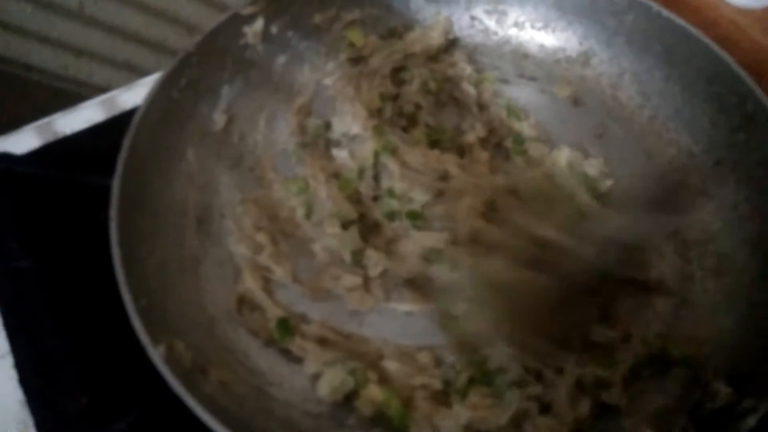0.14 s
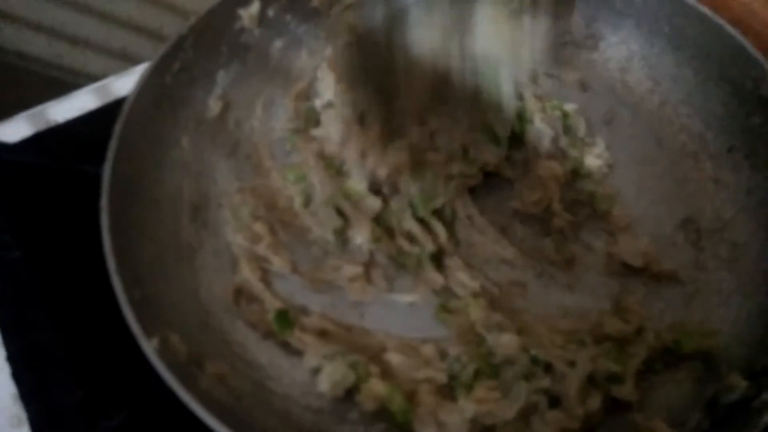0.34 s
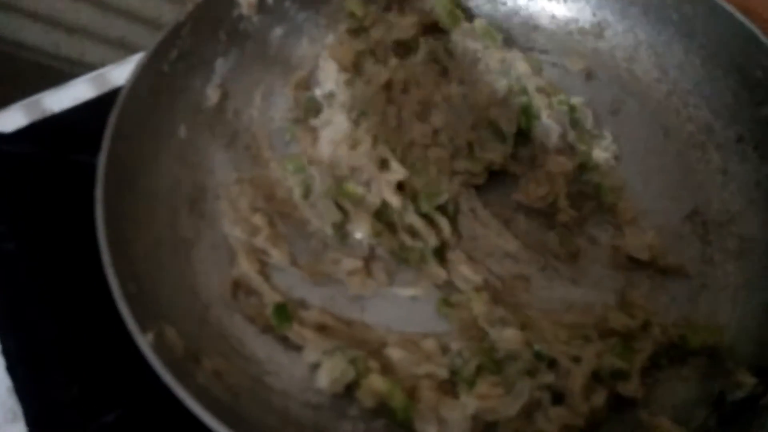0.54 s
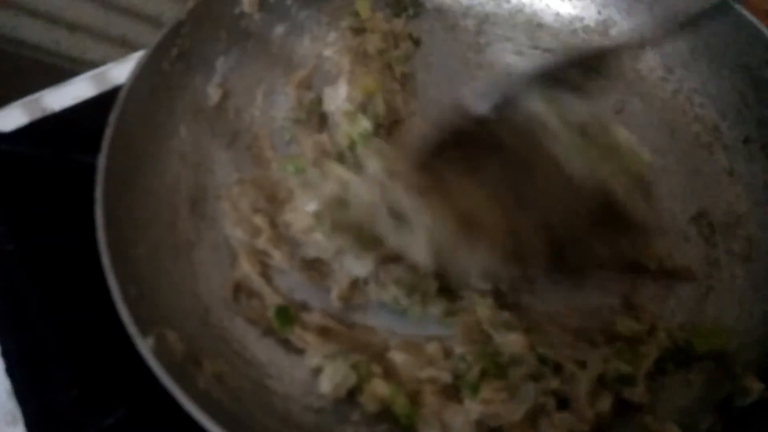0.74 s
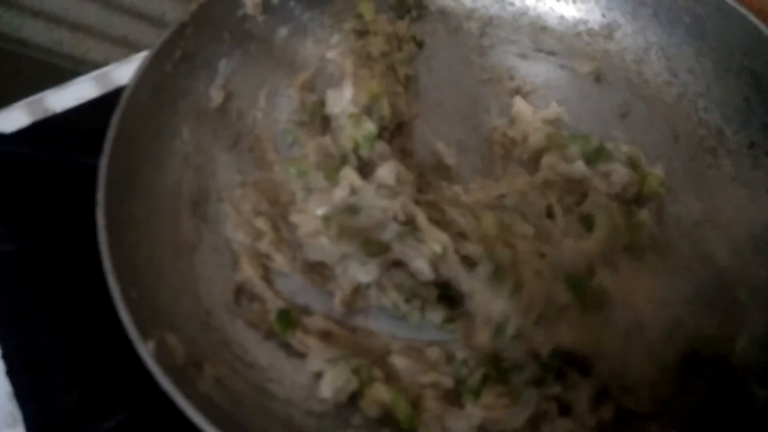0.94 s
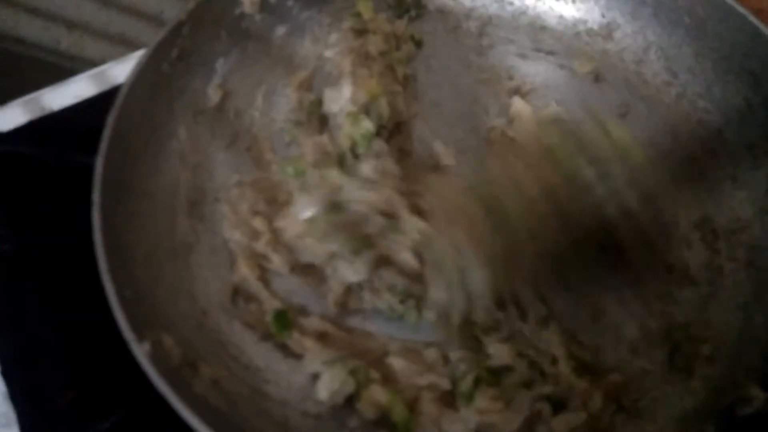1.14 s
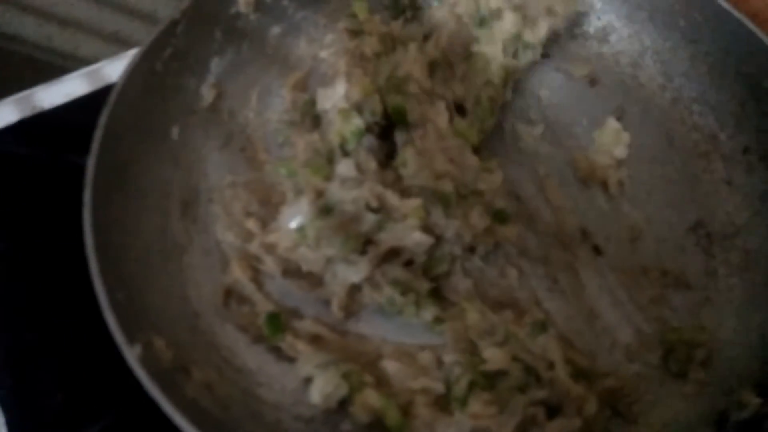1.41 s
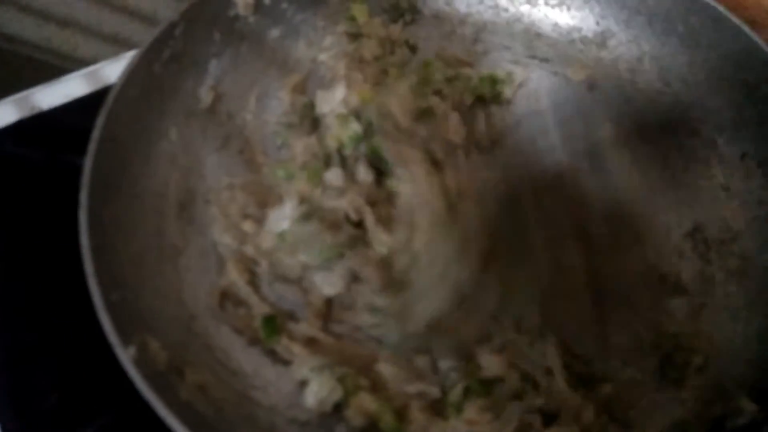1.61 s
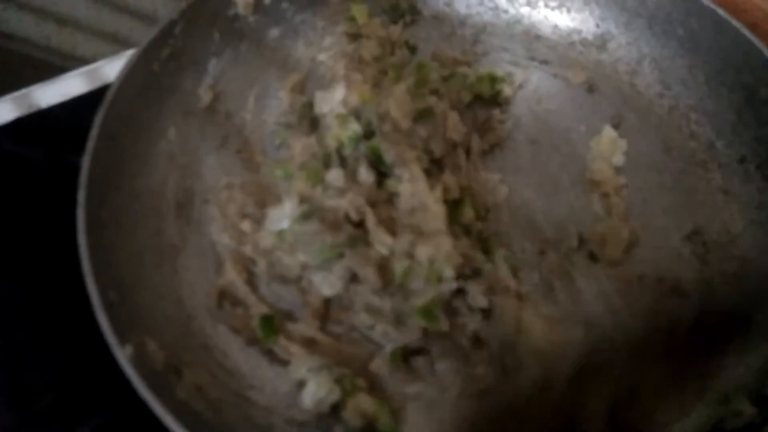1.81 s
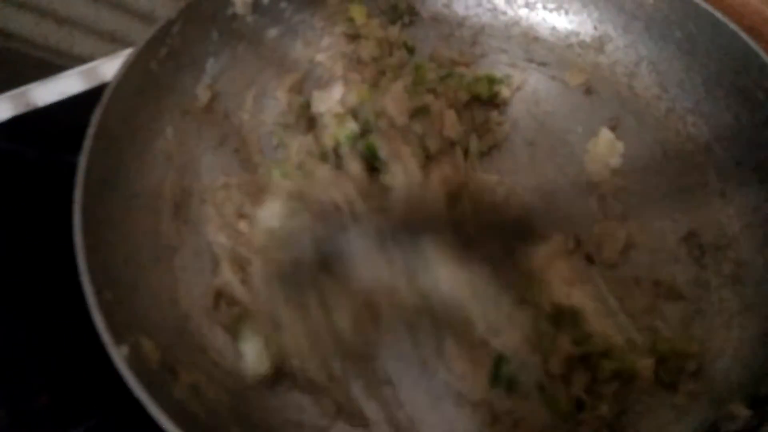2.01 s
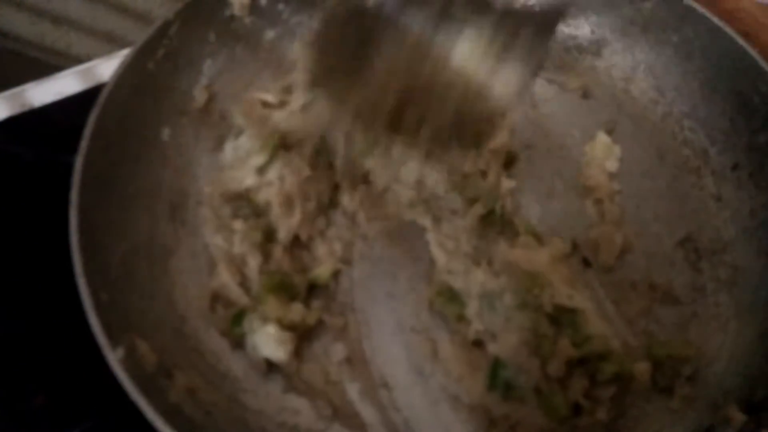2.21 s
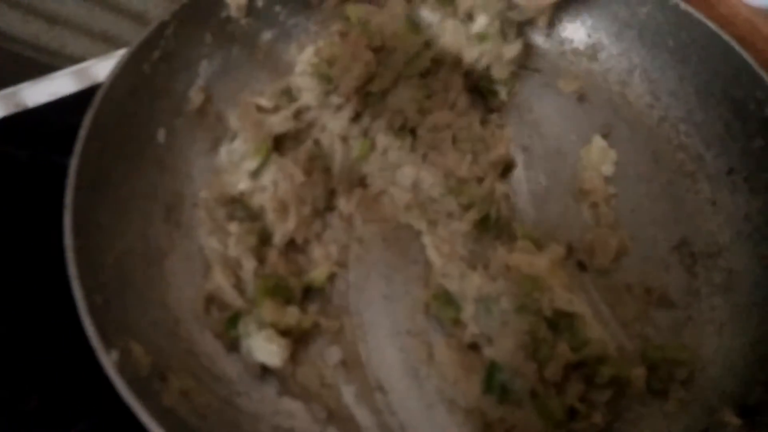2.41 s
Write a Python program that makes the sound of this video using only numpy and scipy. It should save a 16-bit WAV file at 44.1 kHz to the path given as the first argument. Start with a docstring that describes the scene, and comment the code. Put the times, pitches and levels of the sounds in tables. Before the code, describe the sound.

Close up in a small kitchen, a spatula lands on a food-damped frying pan about every half second, knocking and rasping; the strokes after the middle are hardest, with a brief metallic squeal over faint room hum.

```python
"""In a home kitchen, a metal spatula stirs thick sauce in a steel frying pan.
Each stroke lands with a dull push and a double knock, which ring damped pan modes, then scrapes:
dense random slips excite the same modes. The sliding edge briefly sings in gliding tones.
The sticky sauce crackles in filtered grains and ticks in noise puffs. Room tone, a low drone and
the pan's groan lie below, and decaying noise bands give the kitchen's reverberation."""
import sys
import numpy as np
from scipy import signal
from scipy.fft import rfft, irfft
from scipy.io import wavfile

SR = 44100
rng = np.random.default_rng(int(sys.argv[2]) if len(sys.argv) > 2 else 0)


def to_wav(s):
    """Save 16-bit WAV."""
    ch = np.atleast_2d(s).T  # columns
    pcm = np.round(np.clip(ch, -1, 1) * 32767)  # PCM
    wavfile.write(sys.argv[1], SR, pcm.astype(np.int16))


N = 112454

# Modes of the sauce-damped pan. Each row: frequency in Hz, relative level in dB, t60 in seconds.
PAN_MODES = [(304, -33, 0.06), (444.5, -14, 0.17), (581, -15.5, 0.099), (750, -10, 0.06),
             (1059, 4.5, 0.013), (1241.5, -2.5, 0.05), (1367, -2, 0.033), (1563, 5, 0.017),
             (1945, 2, 0.014), (2206, -2.5, 0.025), (2504, -6.5, 0.006), (3580, -4, 0.0091),
             (4356, -4.5, 0.0099), (5385, 7.5, 0.0047), (6284, -3.5, 0.018), (6800, -2.5, 0.022),
             (7845, 3, 0.01), (8450, 4, 0.0078), (9324, 5, 0.012)]
# Spectrum of the sauce crackle. Each row: frequency in Hz, relative density in dB per Hz.
CRACKLE_SPECTRUM = [(1500, -28.5), (3200, -23), (4800, -15), (6000, -10.5), (7500, -7.5), (9150, 1),
                    (11000, -8), (12500, -15), (14000, -8), (15500, -20.5)]
TREBLE_HZ = 3000   # the pan's treble modes lie above this


def amp(db):
    """Level law: 20 dB is a factor of ten in amplitude."""
    return 10 ** (np.asarray(db) / 20)


def rms_one(x):
    """Normalization: scales a signal to unit root mean square."""
    return x / np.sqrt(np.mean(x ** 2) + 1e-20)


def in_time(rows):
    """Linear interpolation: turns rows led by a time in seconds into one curve per column."""
    s, *columns = np.transpose(rows)
    return [np.interp(np.arange(N) / SR, s, c) for c in columns]


def band_pass(x, order, low_hz, high_hz):
    """Band limiting: a Butterworth filter passes low_hz to high_hz."""
    return signal.sosfilt(signal.butter(order, [low_hz, high_hz], "band", fs=SR, output="sos"), x)


def coloured(x, spectrum):
    """Spectral shaping: weights x by a (Hz, dB) curve, at -90 dB beyond its ends."""
    hz, db = np.transpose(spectrum)
    grid = np.arange(len(x) // 2 + 1) * SR / len(x) + 1
    gain = amp(np.interp(np.log(grid), np.log(hz), db, -90, -90))
    return irfft(rfft(x) * gain, len(x))


def ring(clicks, hz, t60):
    """Damped resonance: a unit click sets a decaying sine of initial height 1 ringing."""
    r = amp(-60 / (t60 * SR))
    w = 2 * np.pi * hz / SR
    return signal.lfilter([0, np.sin(w)], [1, -2 * r * np.cos(w), r * r], clicks + 1e-18)


def drift(hz):
    """Low-passed noise: slow random movement of rms 1, with two equal poles at hz."""
    step = 40   # computed on every 40th sample, then interpolated
    r = np.exp(-2 * np.pi * hz * step / SR)
    noise = rng.standard_normal(N // step + 502)
    slow = signal.lfilter([1], [1, -2 * r, r * r], noise)[500:]   # drops the settling time
    return np.interp(np.arange(N) / step, np.arange(len(slow)), rms_one(slow))


def grains(per_s, spread_db):
    """Shot noise: random clicks of uneven size and either sign, rms 1 overall."""
    sizes = amp(spread_db * np.minimum(rng.exponential(1, N), 5)) * rng.choice([-1, 1], N)
    return rms_one(sizes * (rng.random(N) < per_s / SR))


def burst(times, gains, t60s):
    """Exponential decay: short noise puffs die away from each start time."""
    envelope = np.zeros(N)
    t = np.arange(4000) / SR
    for s, gain, t60 in zip(times, gains, t60s):
        i = int(s * SR)
        envelope[i:i + 4000] += gain * amp(-60 * t / max(t60, .001))[:N - i]
    return envelope * rng.standard_normal(N)


def hum(curve, hz, width_hz, steady):
    """Random modulation: a tone wavers in strength and pitch along a level curve."""
    pitch = 1 + .03 * drift(4)   # wavers by a 0.03 share, at up to about 4 Hz
    tone = np.sin(2 * np.pi * hz * np.cumsum(pitch) / SR)
    level = amp(in_time(curve)[0])
    return level * rms_one((steady + drift(width_hz)) * tone)


def room_tone():
    """Stationary noise: a fixed spectrum gives the quiet room hum."""
    # Room spectrum. Each row: frequency in Hz, relative density in dB per Hz.
    room_spectrum = [(15, -12.5), (25, 4), (43, 5.5), (127, 18.5), (228, -2.5), (314, 0.5), (520, -1),
                     (1190, -2.5), (2080, -10.5), (3930, -25), (9220, -53), (11700, -47), (14500, -9)]
    room_db = -62   # rms
    return amp(room_db) * rms_one(coloured(rng.standard_normal(N), room_spectrum))


def low_drone():
    """Narrow-band tone: a low drone fades from the start and then swells once."""
    # Drone level. Each row: time in seconds, level in dB.
    drone_levels = [(0.0, -60), (0.23, -69.5), (0.43, -83), (1.03, -48), (1.16, -58.5), (2.31, -87),
                    (2.5, -81)]
    return hum(drone_levels, hz=63, width_hz=3, steady=2.5)


def pan_groan():
    """Modulated resonance: the pan's lowest mode hums under the stirring."""
    # Groan level. Each row: time in seconds, level in dB.
    groan_levels = [(0.0, -101), (0.14, -82), (0.2, -50.5), (0.33, -56.5), (0.62, -70.5), (1.0, -57.5),
                    (1.24, -71), (1.4, -66), (1.6, -44.5), (1.63, -57), (1.74, -60), (1.81, -71),
                    (1.95, -73.5), (2.11, -61.5), (2.29, -74.5), (2.55, -78)]
    return hum(groan_levels, hz=292, width_hz=36, steady=1.5)


def sauce_crackle():
    """Clumped shot noise: dense grains with a wandering strength form the sticky crackle."""
    # Crackle level. Each row: time in seconds, level in dB.
    crackle_levels = [(0.0, -76), (0.09, -96.5), (0.2, -54.5), (0.33, -71), (0.35, -49), (0.48, -74.5),
                      (0.64, -64), (0.77, -55), (0.85, -55), (1.13, -79.5), (1.2, -56.5), (1.38, -59.5),
                      (1.44, -78.5), (1.65, -88), (1.78, -116.5), (2.01, -57), (2.14, -56), (2.21, -55.5),
                      (2.33, -57.5), (2.47, -79.5), (2.55, -74)]
    grains_per_s, grain_spread_db = 5900, 1
    clump_db, clump_hz = 4.5, 60   # the crackle comes in clumps
    clumped = grains(grains_per_s, grain_spread_db) * amp(clump_db * drift(clump_hz))
    db, = in_time(crackle_levels)
    return amp(db) * rms_one(coloured(clumped, CRACKLE_SPECTRUM))


def sauce_ticks():
    """Filtered transients: each wet tick is a noise puff around its own pitch, over a broad snap."""
    # Single ticks. Each row: start in seconds, relative level in dB, t60 in seconds, centre in Hz.
    wet_ticks = [(0.17, -47, 0.014, 9100), (0.2129, -32, 0.0058, 7960), (0.2934, -36, 0.005, 9900),
                 (0.347, -26, 0.0037, 9110), (0.366, -31.5, 0.006, 5000), (0.385, -39.5, 0.01, 9050),
                 (0.432, -38, 0.0083, 9200), (0.4434, -40, 0.0065, 9520), (0.5524, -41, 0.006, 8950),
                 (0.563, -45, 0.015, 9250), (0.6409, -34.5, 0.0071, 9140), (0.6774, -22, 0.0029, 9640),
                 (0.6881, -34, 0.014, 8250), (0.735, -37, 0.0082, 8600), (0.8082, -42, 0.0099, 7800),
                 (0.83, -45.5, 0.028, 7600), (0.8625, -35, 0.0046, 9200), (0.902, -42.5, 0.0085, 9300),
                 (0.9295, -50, 0.015, 13400), (0.951, -52, 0.011, 8530), (0.9715, -46.5, 0.0076, 8960),
                 (1.0048, -44.5, 0.0061, 7200), (1.1954, -30.5, 0.0047, 9700), (1.259, -29, 0.008, 8700),
                 (1.2877, -39.5, 0.0093, 9100), (1.3673, -37.5, 0.0099, 8920),
                 (1.6892, -17.5, 0.0034, 8860), (1.7364, -26, 0.0072, 8600), (1.7657, -15.5, 0.0025, 8720),
                 (1.9672, -36, 0.005, 8900), (2.2214, -32, 0.0054, 9200), (2.2408, -35, 0.0091, 8730),
                 (2.2538, -34.5, 0.0079, 5410), (2.2829, -30.5, 0.0045, 9200), (2.3523, -30, 0.0043, 8770),
                 (2.521, -43.5, 0.0062, 8880)]
    half_width_share, rise_s = 0.12, 0.0016
    pitched_db, snap_db = 12.5, -8
    out = np.zeros(N + 2000)
    t = np.arange(2000) / SR
    for s, db, t60, hz in wet_ticks:
        envelope = amp(db - 60 * t / max(t60, .002)) * np.minimum(t / rise_s, 1)
        puff = rng.standard_normal(len(t)) * envelope
        high_hz = min(hz * (1 + half_width_share), .45 * SR)
        pitched = band_pass(puff, 2, hz * (1 - half_width_share), high_hz)
        snap = band_pass(puff, 3, 4800, 15000)
        out[int(s * SR):][:len(t)] += amp(pitched_db) * pitched + amp(snap_db) * snap
    return out[:N]


def knocks():
    """Modal impact: a push, then a double contact that rings every pan mode, plus a dry crack."""
    # Blade on pan. Each row: time in seconds, knock level in dB, gain of the body below 900 Hz in dB,
    # gain of the upper mids in dB, gain of the treble in dB, level of the soft push before it in dB.
    # All levels are relative.
    blade_knocks = [(0.1862, -5.5, -1.5, -4, -11, -28.5), (0.6563, -11, -9, 1, -10, -39),
                    (1.1444, -19, 10, -2, -4, -48.5), (1.4814, -13.5, -6, 8, 1.5, -33),
                    (1.4898, -18, 12, 12, -0.5, -63.5), (1.5777, -1, -18, 10, -2.5, -26),
                    (1.984, -14.5, 5.5, 3, -7.5, -37.5), (2.0459, -13.5, 3.5, 1, -0.5, -60)]
    body_hz, upper_hz, spread_db = 900, 1700, 2.5
    rebound_s, rebound_db = 0.0019, -15.5   # the blade edge lands twice
    push_lead_s, push_hz, push_t60_s = 0.00705, 610, 0.023   # the push arrives first
    thwack_hz, thwack_db, thwack_t60_s = 1241, -9.5, 0.012   # the blunt first instant
    crack_db, crack_t60_s = -9.5, 0.029

    s, db, body_db, upper_db, treble_db, push_db = np.transpose(blade_knocks)
    first = (s * SR).astype(int)
    second = ((s + rebound_s) * SR).astype(int)
    chance = rng.normal(0, spread_db, (len(s), len(PAN_MODES), 2))
    modes = np.zeros(N)
    for k, (hz, mode_db, t60) in enumerate(PAN_MODES):
        level = db - 15.5 + mode_db
        level = level + body_db * (hz < body_hz)
        level = level + upper_db * (upper_hz < hz < TREBLE_HZ)
        level = level + treble_db * (hz > TREBLE_HZ)
        clicks = np.zeros(N)
        clicks[first] = (-1) ** k * amp(level + chance[:, k, 0])   # sign alternates between modes
        clicks[second] = amp(level + rebound_db + chance[:, k, 1])
        modes += ring(clicks, hz, t60)

    blow, push = np.zeros((2, N))
    blow[first] = amp(db + thwack_db)
    thwack = ring(blow, thwack_hz, thwack_t60_s)
    push[((s - push_lead_s) * SR).astype(int)] = amp(push_db)
    soft_push = np.convolve(push, np.hanning(31) / 10)[:N]   # a rounded pulse
    push = ring(soft_push, push_hz, push_t60_s)
    crack = burst(s, amp(db + treble_db + crack_db), [crack_t60_s] * len(s))
    return modes + thwack + push + band_pass(crack, 3, 2500, 10000)


def scrape():
    """Friction excitation: dense slips of the edge ring the pan modes under the stroke's pressure."""
    # One list per scraping stroke. Each row: time in seconds, relative level in dB,
    # treble in dB over that level.
    strokes = [
        [(0.195, -41.5, -6), (0.237, -39, -23), (0.299, -60.5, 13.5), (0.311, -68, -1), (0.441, -63, -6),
         (0.471, -51.5, -10), (0.52, -64, -33)],
        [(0.665, -33, -13.5), (0.731, -55, 1), (0.8, -99, 3)],
        [(1.15, -49.5, -12.5), (1.158, -37.5, 0), (1.178, -31.5, -8), (1.2, -52.5, 5), (1.208, -50, -39.5),
         (1.294, -63, 19.5), (1.31, -86.5, -4.5)],
        [(1.495, -16.5, -19.5), (1.505, -49.5, 4), (1.525, -51.5, -5), (1.537, -47, 2), (1.565, -60, 13)],
        [(1.587, -45.5, -14), (1.591, -25.5, -14.5), (1.637, -42, 12.5), (1.657, -25, 1), (1.675, -37, -10.5),
         (1.693, -41, 4), (1.72, -35.5, -16.5)],
        [(1.992, -32, -12), (2.0, -38, 1), (2.05, -28, -3.5), (2.062, -33, 2), (2.126, -31.5, -6.5),
         (2.162, -41.5, -27), (2.17, -53, -9)],
    ]
    slips_per_s, slip_spread_db = 6000, 2.0
    wander_db, wander_hz = 3.0, 30   # each mode's share wanders as the contact point moves
    grit_db, grit_low_hz, grit_high_hz = -4.5, 657, 2700   # unpitched, under the low modes
    rasp_db = -4
    rows = []
    for stroke in strokes:
        rows.append((stroke[0][0] - .004, -90, 0))
        rows += list(stroke)
        rows.append((stroke[-1][0] + .013, -90, 0))
    db, treble_db = in_time(rows)

    slips = grains(slips_per_s, slip_spread_db)
    low, high = np.zeros((2, N))
    for k, (hz, mode_db, t60) in enumerate(PAN_MODES):
        wandering = slips * amp(wander_db * drift(wander_hz))
        mode = amp(mode_db) * (-1) ** k * ring(wandering, hz, t60)
        if hz < TREBLE_HZ:
            low += mode
        else:
            high += mode
    grit = rms_one(band_pass(slips, 2, grit_low_hz, grit_high_hz))
    rasp = rms_one(coloured(slips, CRACKLE_SPECTRUM))
    low = rms_one(low) + amp(grit_db) * grit
    high = rms_one(high) + amp(rasp_db) * rasp
    return amp(db - 6) * (low + amp(treble_db) * high)


def squeals():
    """Frequency glide: the sliding edge sings in rough, broken tones under a smooth swell."""
    # Singing tones. Each row: start in seconds, length in seconds, first pitch in Hz,
    # last pitch in Hz, relative level in dB.
    singing_tones = [(0.264, 0.054, 10100, 9860, -47), (.30, 0.038, 9300, 9150, -55.5),
                     (0.449, 0.071, 900, 880, -53.5), (1.07, 0.18, 865, 890, -54.5),
                     (0.21, 0.16, 1050, 1099, -50), (1.161, 0.038, 2025, 1750, -40.5),
                     (0.662, 0.0836, 2200, 1850, -45.5), (1.608, 0.078, 2030, 1960, -27.5),
                     (1.6, 0.079, 1340, 1520, -27), (1.613, 0.053, 2600, 2640, -43.5),
                     (1.615, 0.037, 3410, 3390, -43), (1.622, 0.042, 5450, 5400, -39),
                     (1.613, 0.03, 9150, 8960, -36), (1.994, 0.062, 1300, 1750, -36),
                     (2.011, 0.06, 5000, 6250, -46), (2.067, 0.032, 6100, 7030, -47.5),
                     (2.087, 0.057, 5260, 7500, -54), (2.27, 0.13, 813, 832, -58)]
    rough_steady, clean_steady = .5, 2.2   # steady share against the waver
    clean_hz, clean_glide_share = 2400, .02   # high partials that hold their pitch sing cleaner
    width_share = .05
    out = np.zeros(N)
    for s, length, from_hz, to_hz, db in singing_tones:
        i, n = int(s * SR), int(length * SR)
        clean = from_hz > clean_hz and abs(to_hz / from_hz - 1) < clean_glide_share
        steady = clean_steady if clean else rough_steady
        waver = drift(np.clip(width_share * from_hz, 90, 200))[i:i + n]
        tone = np.sin(2 * np.pi * np.cumsum(np.linspace(from_hz, to_hz, n)) / SR)
        out[i:i + n] += amp(db) * np.sqrt(np.hanning(n)) * (steady + waver) * tone
    return out


def kitchen(x):
    """Diffuse reverberation: convolution with octave bands of exponentially dying noise."""
    # Octave bands. Each row: centre in Hz, t60 in seconds, relative level in dB.
    octaves = [(250, 0.28, -10.5), (582, 0.48, -16.5), (1020, 0.55, -20), (2186, 0.56, -22),
               (3700, 0.44, -21), (8480, 0.45, -28)]
    t = np.arange(SR * 2 // 3) / SR
    onset = np.clip(t / 0.0013 - .3, 0, 1)
    answer = 0
    for hz, t60, db in octaves:
        band = band_pass(rng.standard_normal(len(t)), 2, hz / np.sqrt(2), hz * np.sqrt(2))
        answer = answer + amp(db - 60 * t / t60) * band * onset
    return signal.fftconvolve(x, answer)[:N] / 10


def scene():
    """Superposition: direct sounds, their reverberation and the steady background add."""
    background = room_tone() + low_drone() + pan_groan()
    pan = sauce_crackle() + sauce_ticks() + knocks() + scrape()
    pan = signal.sosfilt(signal.butter(4, 261.2, "high", fs=SR, output="sos"), pan)   # Hz
    song = squeals()
    song_to_room_db = -14   # the squeals reach the walls more weakly
    echo = kitchen(pan + amp(song_to_room_db) * song)
    return (pan + song + echo + background)[None]


def record(dry):
    """Low-pass filtering: the top falls away steeply, then is cut."""
    edge_hz, edge_db, cutoff_hz = 14350, -40, 16000
    low = signal.sosfiltfilt(signal.ellip(10, .2, 30, edge_hz, fs=SR, output="sos"), dry)
    out = low + amp(edge_db) * (dry - low)
    return signal.sosfilt(signal.cheby2(12, 70, cutoff_hz, fs=SR, output="sos"), out)


dry = scene()
out = record(dry)
to_wav(out)
```